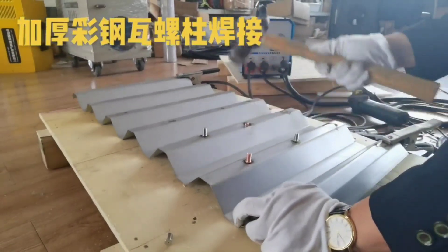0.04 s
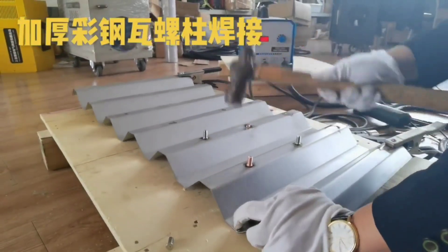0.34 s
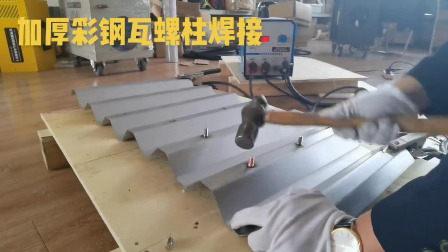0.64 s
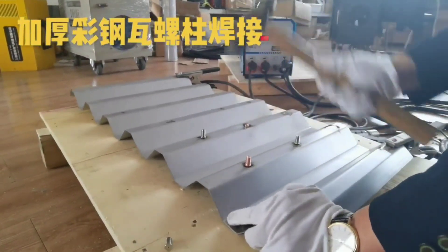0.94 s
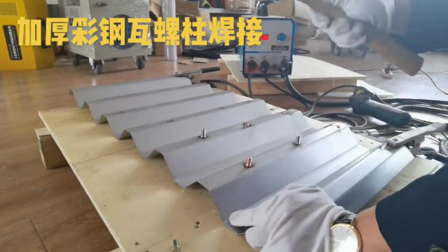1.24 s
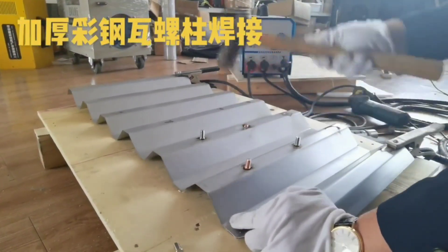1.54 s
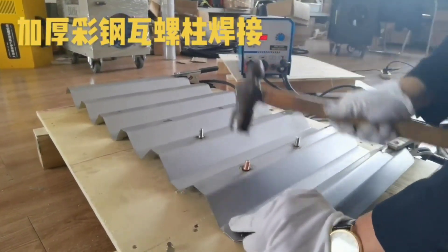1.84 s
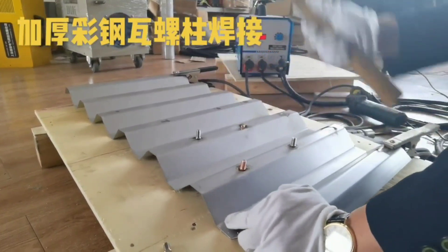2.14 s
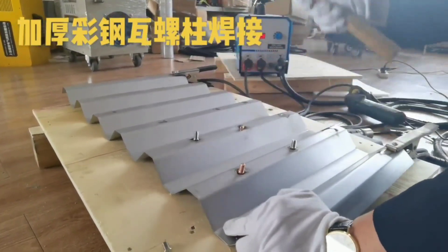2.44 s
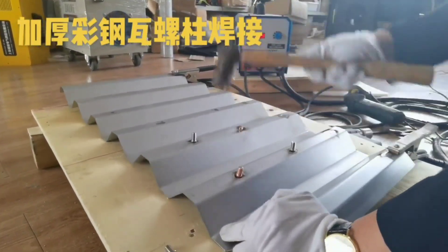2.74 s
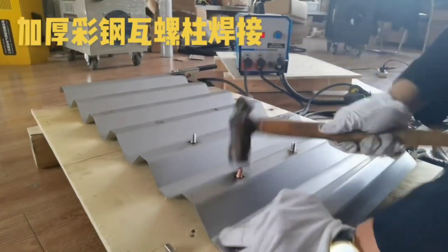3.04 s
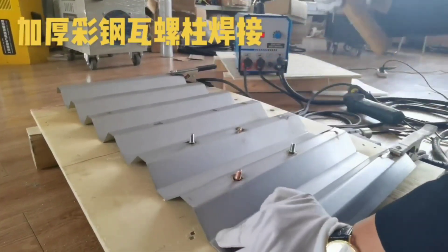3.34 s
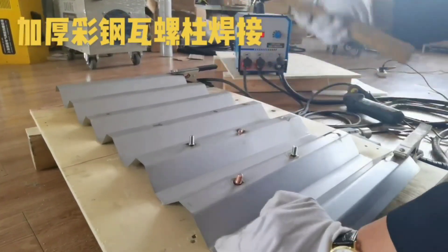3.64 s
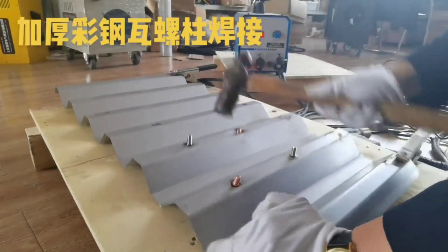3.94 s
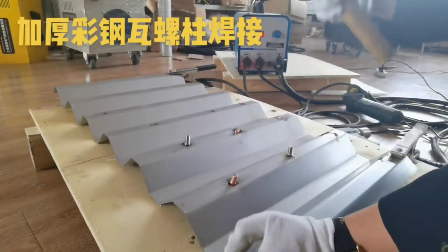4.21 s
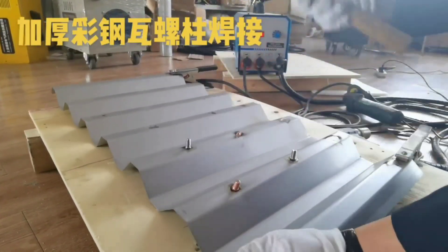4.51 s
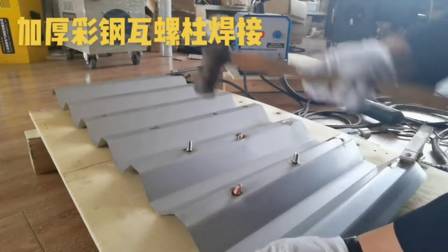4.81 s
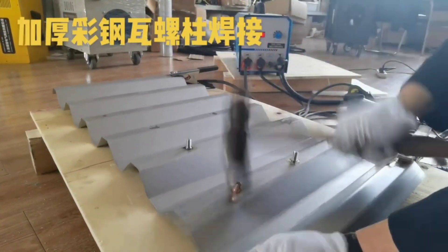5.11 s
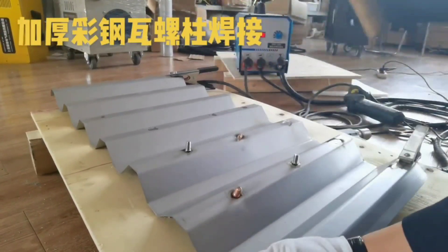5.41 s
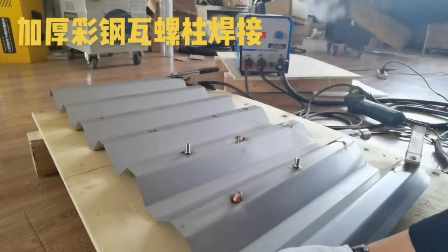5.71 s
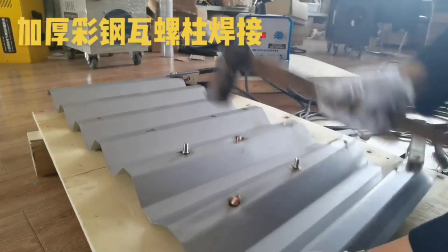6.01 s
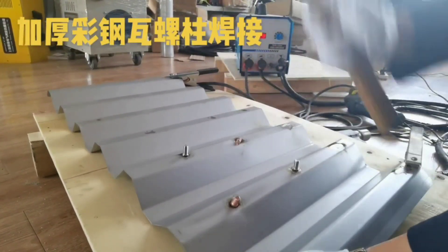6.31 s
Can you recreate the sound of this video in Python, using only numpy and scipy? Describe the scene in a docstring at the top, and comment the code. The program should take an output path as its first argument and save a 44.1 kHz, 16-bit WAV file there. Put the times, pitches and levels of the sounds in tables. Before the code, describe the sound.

A hammer strikes a steel stud on a corrugated metal sheet at an even pace, about two and a half blows a second. Each hit is a sharp crack with a low thump from the wooden board beneath, followed by a brief crashing ring of the whole sheet. The clang gradually thins as the stud flattens. The blows sound close, over very faint workshop rumble and hiss.

```python
"""A workshop: a hammer strikes a steel stud welded to a corrugated roofing sheet, about 2.5 blows a second.
Each blow cracks, thumps the wooden board below and sets the whole sheet crashing and ringing.
The loose sheet springs back after each blow, and the hardest ones bring out a whine from the hammer head.
The sound thins as the stud is flattened. A limiter ducks on the crack and recovers as the sheet fades."""
import sys
import numpy as np
from scipy import signal
from scipy.fft import rfft, irfft
from scipy.io import wavfile

SR = 44100
rng = np.random.default_rng(int(sys.argv[2]) if len(sys.argv) > 2 else 0)


def materialize(psi):
    """Save the field psi as 16-bit PCM at rate SR to the path in sys.argv[1].

    A 1-D psi becomes a single channel; in a 2-D psi each row is a channel.
    """
    bounded = np.clip(np.atleast_2d(psi).T, -1, 1)
    quanta = np.round(bounded * 32767).astype(np.int16)
    wavfile.write(sys.argv[1], SR, quanta)


N = 280476
RING_S = np.arange(SR * 3 // 4) / SR  # time since a blow


def from_db(db):
    return 10 ** (np.asarray(db) / 20)


def unit_rms(x):
    return x / np.sqrt(np.mean(x ** 2) + 1e-20)


def at_hz(table, hz):
    """Table lookup on a log-frequency axis."""
    f, value = np.transpose(table)
    return np.interp(np.log(hz + 1), np.log(f), value)


def between(ends, share):
    return ends[0] + (ends[1] - ends[0]) * np.clip(share, 0, 1)


def lag(x, tau_s):
    keep = np.exp(-1 / (tau_s * SR))
    return signal.lfilter([1 - keep], [1, -keep], x)


def add(mix, start_s, sound):
    at = round(start_s * SR)
    sound = sound[:, max(-at, 0):]
    part = mix[:, max(at, 0):][:, :sound.shape[1]]
    part += sound[:, :part.shape[1]]


def comb(width_hz, depth_db):
    """Random small resonances, shallower in the bass: a gain on one blow's spectrum."""
    hz = np.fft.rfftfreq(len(RING_S), 1 / SR)
    knots_hz = np.arange(0, SR / 2, width_hz)
    ripple = np.interp(hz, knots_hz, rng.standard_normal(len(knots_hz)))
    return unit_rms(from_db(depth_db * np.clip(ripple, -2, 2) * np.minimum(hz / 1000, 1)))


# Left-right coherence: f/Hz, coherence (clipped to 0-1)
COHERENCE = [(40, -0.67), (200, 1.08), (450, 0.78), (800, 0.76), (1250, 0.48), (2000, 0.39), (8000, -0.08)]
# Left phase lead: f/Hz, phase/rad
LEFT_LEAD = [(200, 0.086), (450, 0.1), (800, 0.19), (1250, 1.06), (2000, 2.24), (3500, 1.46), (5500, 0.17)]
# Left over right: f/Hz, level/dB
LEFT_BALANCE = [(50, 6), (200, -3), (800, -2), (2000, -2.9), (5500, -3.5), (9000, 1), (13000, 0.5)]
def stereo_amplitudes(count, hz):
    """Random complex amplitudes at two microphone ports."""
    left, other = rng.standard_normal((2, count)) + 1j * rng.standard_normal((2, count))
    alike = np.clip(at_hz(COHERENCE, hz), 0, 1)
    right = (alike * left + np.sqrt(1 - alike ** 2) * other) * np.exp(-1j * at_hz(LEFT_LEAD, hz))
    tilt = from_db(at_hz(LEFT_BALANCE, hz) / 2)
    return np.array([left * tilt, right / tilt])


def noise(spectrum, size):
    hz = np.fft.rfftfreq(size, 1 / SR)
    return unit_rms(irfft(stereo_amplitudes(len(hz), hz) * from_db(at_hz(spectrum, hz)), size))


def combed_noise(spectrum, comb_gain):
    return irfft(rfft(noise(spectrum, len(RING_S))) * comb_gain, len(RING_S))


# Room noise: f/Hz, relative density/dB
ROOM_SPECTRUM = [(25, -73.5), (60, 13), (200, -22), (1000, -37), (3000, 1), (8000, -1), (14000, -50.5)]
def room_noise(level_db=-65):
    """Faint, steady rumble and hiss."""
    return from_db(level_db) * noise(ROOM_SPECTRUM, N)


def flex(mix, centre_s, level_db, length_s, hz):
    """One deep bending mode of the sheet swells briefly."""
    t = np.arange(round(length_s * SR)) / SR
    swell = from_db(level_db) * np.hanning(len(t)) * np.sin(2 * np.pi * hz * t)
    pan = from_db(at_hz(LEFT_BALANCE, hz) * np.array([[.5], [-.5]]))
    add(mix, centre_s - length_s / 2, swell * pan)


# Late swells of the sheet: centre t/s, level/dB, length/s, f/Hz
LATE_FLEXES = [(0.391, -22, 0.11, 226), (4.36, -21.5, 0.11, 376), (4.862, -24, 0.0476, 238)]
def late_flexes(mix):
    """The loose sheet flexes again late after some blows."""
    for row in LATE_FLEXES:
        flex(mix, *row)


def hammer_head(force_db, hz=8312, level_db=-43, db_per_db=2.2, t60_s=.8):
    """The head's own thin ring; grows faster than the force."""
    whine = np.sin(2 * np.pi * hz * RING_S) * 1000 ** (-RING_S / t60_s)
    return from_db(level_db + db_per_db * force_db) * np.array([whine, whine])


# Build-up of the sheet's ring: f/Hz, time constant/s
SHEET_RISE = [(220, 0.024), (420, 0.073), (800, 0.017), (2000, 0.0075), (8000, 0.01)]
def ring_envelope(t, hz, t60_s):
    """Waves spread from the stud, then decay; slow, long ones take longer to fill the sheet."""
    return (1 - np.exp(-t / at_hz(SHEET_RISE, hz))) * 1000 ** (-t / t60_s)


# Dense modes of the sheet: f/Hz, relative density/dB
WASH_SPECTRUM = [(35, -46.5), (120, -5), (160, -4), (235, 4.5), (300, -4), (420, 7.5), (720, 2.5),
                 (1250, -5.5), (1600, -6), (3200, -11.5), (3900, -15), (5600, -9), (8500, -13.5),
                 (12000, -19)]
# Their decay: f/Hz, T60/s
WASH_DECAY = [(60, 0.12), (220, 0.69), (700, 0.35), (1500, 0.65), (3000, 0.56), (6000, 0.5), (10000, 0.46),
              (14000, 0.17)]
def sheet_wash(comb_gain):
    """Countless close modes merge into a crash."""
    hz, t, bands = signal.stft(combed_noise(WASH_SPECTRUM, comb_gain), SR, nperseg=256)
    bands = bands * ring_envelope(t, hz[:, None], at_hz(WASH_DECAY, hz)[:, None])
    return signal.istft(bands, SR, nperseg=256)[1][:, :len(RING_S)]


# Standing-mode clusters: f/Hz, level/dB, T60/s
SHEET_MODES = [(160, -3, .45), (225, 2, .5), (374, -7, .5), (418, 2, .52), (604, 0, .33), (849, 2, .35),
               (935, 0, .38), (1038, -2, .4), (1165, -3, .42), (1303, -1, .48), (1398, -12, .6),
               (1466, -10, .65), (1512, -13, 1.0), (1600, -12, .68), (1905, -17, .65), (2099, -13, .62),
               (2355, -11, .72), (2691, -14, .58), (3190, -11, .6), (3558, -21, .7), (4118, -23, .72),
               (5273, -14, .36), (5813, -21, .7)]
def sheet_modes(split_hz=8, split_share=0.00179, partners=6):
    """The corrugations split each mode into close partners that beat; each blow excites them anew."""
    coarse_s = RING_S[::128]
    ring = np.zeros((2, len(RING_S)))
    for hz, level_db, t60_s in SHEET_MODES:
        offsets_hz = (split_hz + split_share * hz) * rng.standard_normal((partners, 1))
        beats = stereo_amplitudes(partners, hz) @ np.exp(2j * np.pi * offsets_hz * coarse_s)
        envelope = ring_envelope(coarse_s, hz, t60_s)
        swell = beats * envelope
        swell *= from_db(level_db) * np.linalg.norm(envelope) / np.linalg.norm(swell) * np.sqrt(2)
        swell = np.array([np.interp(RING_S, coarse_s, side) for side in swell])
        ring += (swell * np.exp(2j * np.pi * hz * RING_S)).real
    return ring


def sheet(comb_gain, boom_db, clang_db, edge_db, wash_db=-9.5, modes_db=-20.5):
    """The whole sheet rings, deeper or harder depending on the blow."""
    ring = from_db(wash_db) * sheet_wash(comb_gain) + from_db(modes_db) * sheet_modes()
    colour = [(420, boom_db), (650, clang_db), (1300, clang_db), (2000, 0), (3200, edge_db), (5500, 0)]
    colour_db = at_hz(colour, np.fft.rfftfreq(SR, 1 / SR))
    return irfft(rfft(ring, SR) * from_db(colour_db), SR)[:, :len(RING_S)]


def burst(spectrum, level_db, t60_s, rise_s):
    """Heavily damped response, coloured by the landing spot."""
    response = combed_noise(spectrum, comb(width_hz=260, depth_db=2.5))
    return from_db(level_db) * response * 1000 ** (-RING_S / t60_s) * (1 - np.exp(-RING_S / rise_s))


# Steel on steel: f/Hz, relative density/dB
CRACK_SPECTRUM = [(60, -33), (300, -13), (1500, 4), (3000, 5.5), (4000, 0), (5500, 12.5), (8000, 6.5),
                  (10000, 1.5), (12000, -20), (15500, -33)]
# Sheet around the stud: f/Hz, relative density/dB
KNOCK_SPECTRUM = [(100, -24), (280, -36), (390, 17), (500, -29.5), (630, 13), (730, -1), (850, 14),
                  (980, -2.5), (1160, 8), (1700, -18), (5000, -41.5)]
# Wooden board: f/Hz, relative density/dB
THUMP_SPECTRUM = [(20, -56), (45, 28), (90, 25), (160, 2), (400, 23), (2000, -76)]
def contact(crack_db, knock_db, thump_db, crack_t60_s):
    """Steel meets steel, the stud drives the sheet down, the sheet hits the board."""
    crack = burst(CRACK_SPECTRUM, crack_db - 3.5, crack_t60_s, rise_s=0.0054)
    knock = burst(KNOCK_SPECTRUM, knock_db - 6, t60_s=.09, rise_s=.005)
    thump = burst(THUMP_SPECTRUM, thump_db - 22.5, t60_s=0.097, rise_s=0.00079)
    return crack + knock + thump


# (fresh stud, flat stud)
BOOM_DB, CLANG_DB, EDGE_DB, STUD_KNOCK_DB = (1.5, -2.5), (4, -3), (-1, 1.5), (3, -10)
# (rigid stud, full give)
GIVE_CRACK_DB, GIVE_CRACK_T60_S, GIVE_KNOCK_DB = (6.5, -2.5), (0.014, .085), (-0.5, 3)
# (sheet on the board, fully lifted)
LIFT_THUMP_DB, LIFT_BOOM_DB = (6.5, -34), (1, 3.5)
def blow(sheet_comb, flatness, give, lift):
    """A yielding stud cracks softer and longer, knocks harder; a lifted sheet booms more, thumps less."""
    boom_db = between(BOOM_DB, flatness) + between(LIFT_BOOM_DB, lift)
    knock_db = between(STUD_KNOCK_DB, flatness) + between(GIVE_KNOCK_DB, give)
    crack_db, crack_t60_s = between(GIVE_CRACK_DB, give), between(GIVE_CRACK_T60_S, give)
    aim_comb = comb(width_hz=90, depth_db=1.8)  # no two blows land alike
    ring = sheet(sheet_comb * aim_comb, boom_db, between(CLANG_DB, flatness), between(EDGE_DB, flatness))
    return ring + contact(crack_db, knock_db, between(LIFT_THUMP_DB, lift), crack_t60_s)


# Hammer blows: t/s, force/dB, give of the stud/0-1, lift of the sheet off the board/0-1
HAMMER_BLOWS = [(-.17, -0.5, 0.2, 0.9), (.174, -0.5, 0.33, 0.4), (0.5601, 1.1, 0.8, 0.37),
                (0.934, -3, 0.94, 0.65), (1.3524, -4, 0.26, 0.67), (1.755, -2, .2, 0.6),
                (2.16, -4.5, 0.1, 0.09), (2.563, -3.5, 0.28, 0), (2.974, -3, 0.3, 0.18),
                (3.4008, -2, 0.38, 0.33), (3.8162, -1.5, 0.14, 0.06), (4.253, -1.2, 0.16, 0.2),
                (4.6677, -1.5, 0.09, 0.02), (5.0785, -0.5, 0.18, 0.07), (5.4926, 0.5, 0.11, 0.02),
                (5.906, 2, 0.07, 0.21), (6.3197, 0.5, .08, 0.13)]
def hammering(mix, rebound_s=.095, rebound_db=-22):
    """Each blow flattens the stud a step further; the sheet springs back a moment later."""
    sheet_comb = comb(width_hz=22, depth_db=4)  # the same modes stand out at every blow
    flatnesses = np.linspace(0, 1, len(HAMMER_BLOWS))
    for (start_s, force_db, give, lift), flatness in zip(HAMMER_BLOWS, flatnesses):
        strike = from_db(force_db) * blow(sheet_comb, flatness, give, lift)
        add(mix, start_s, strike + hammer_head(force_db))
        flex_db = rebound_db + force_db + between(BOOM_DB, flatness)
        flex(mix, start_s + rebound_s, flex_db, length_s=.05, hz=210.8)


def scene():
    mix = room_noise()
    late_flexes(mix)
    hammering(mix)
    return mix


def limiter(x, sense_hz=1500, threshold_db=-20.5, recovery_db_per_s=115, makeup_db=4):
    """Ducks just after the treble passes the threshold; a slow stage backs off as blows keep coming."""
    treble = signal.lfilter(*signal.butter(2, sense_hz, "high", fs=SR), x)
    treble_db = 10 * np.log10(lag((treble ** 2).mean(0), tau_s=.007) + 1e-12)
    fall_db = np.arange(N) / SR * recovery_db_per_s
    held_db = np.maximum.accumulate(treble_db + fall_db) - fall_db
    over_db = np.maximum(held_db - threshold_db, 0)
    fast_db, slow_db = lag(over_db, tau_s=.0035), 14 * lag(over_db, tau_s=5.1)
    return x * from_db(makeup_db - fast_db - slow_db)


def record(dry):
    """Limiter, soft overload, band limit."""
    low_pass = signal.firwin(301, cutoff=15500, window=("kaiser", 9), fs=SR)
    return signal.oaconvolve(np.tanh(limiter(dry)), low_pass[None], "same", axes=1)


dry = scene()
out = record(dry)
materialize(out)
```